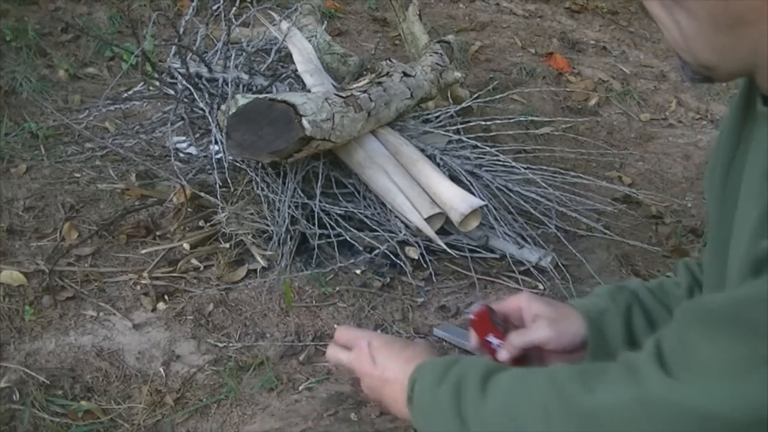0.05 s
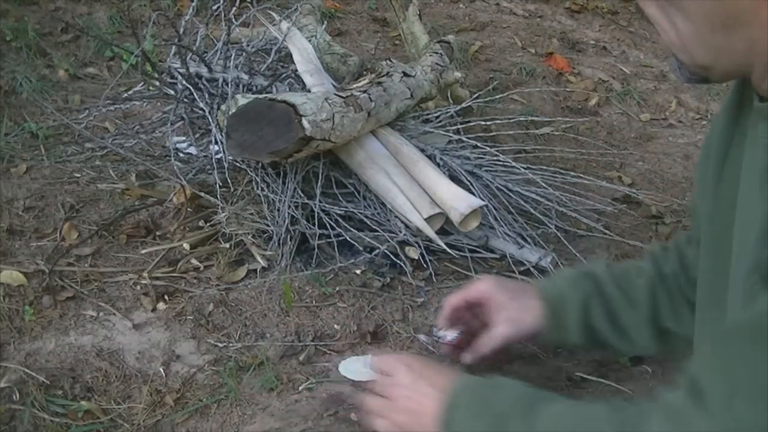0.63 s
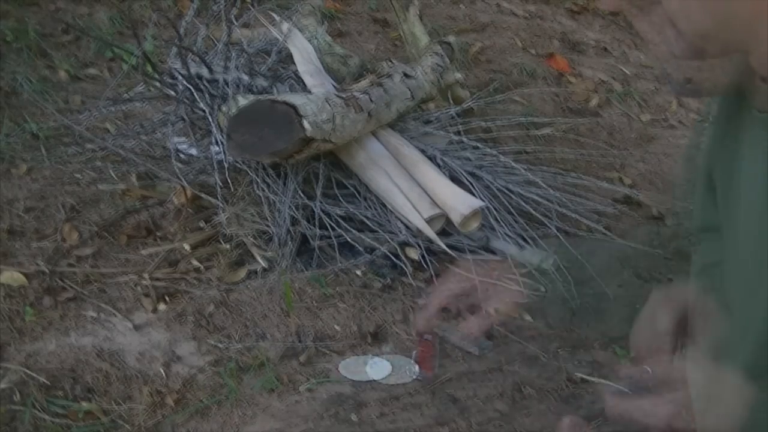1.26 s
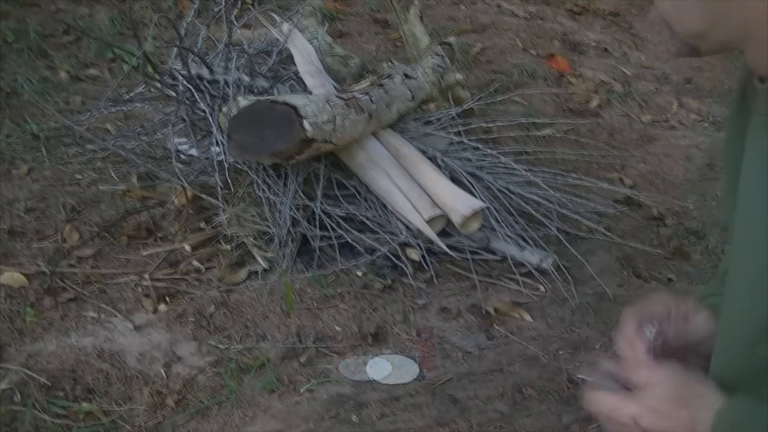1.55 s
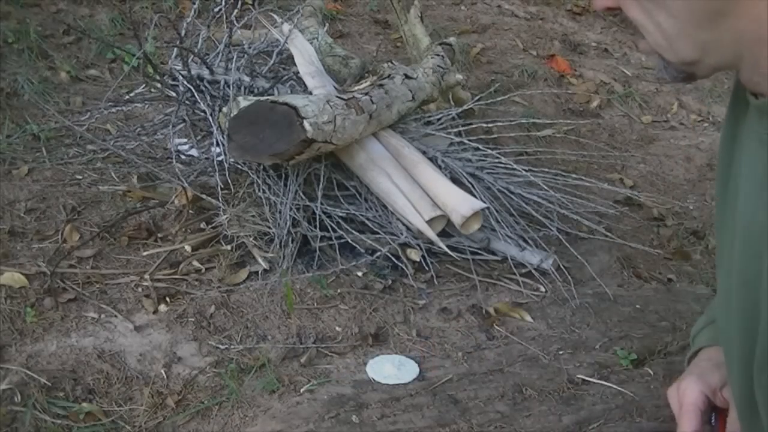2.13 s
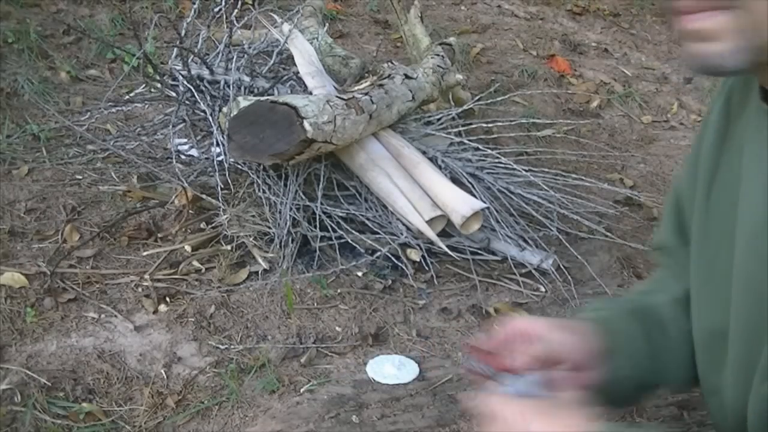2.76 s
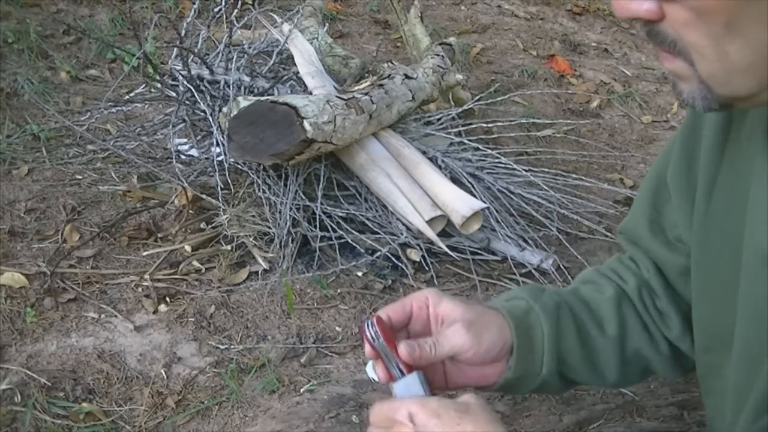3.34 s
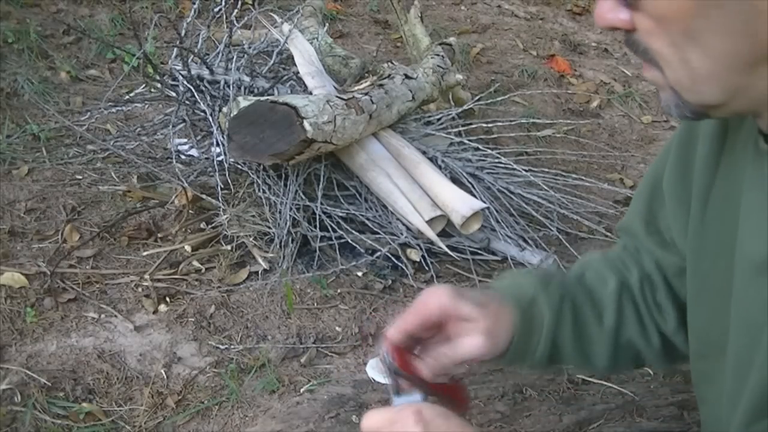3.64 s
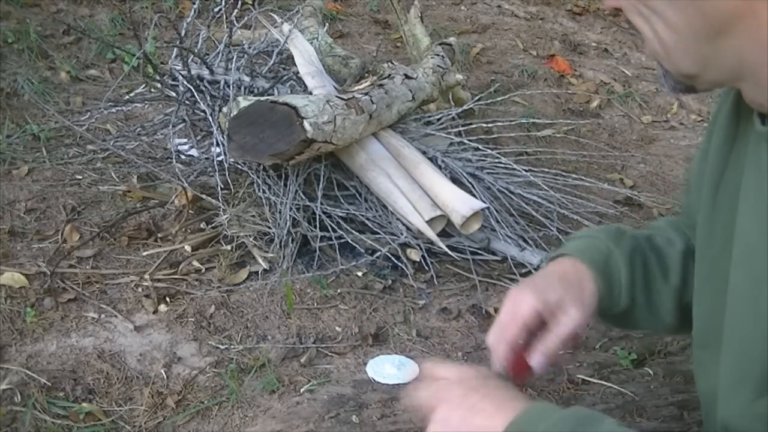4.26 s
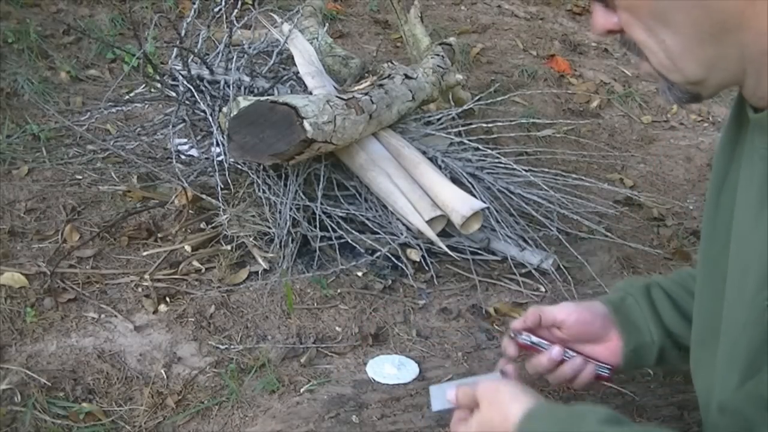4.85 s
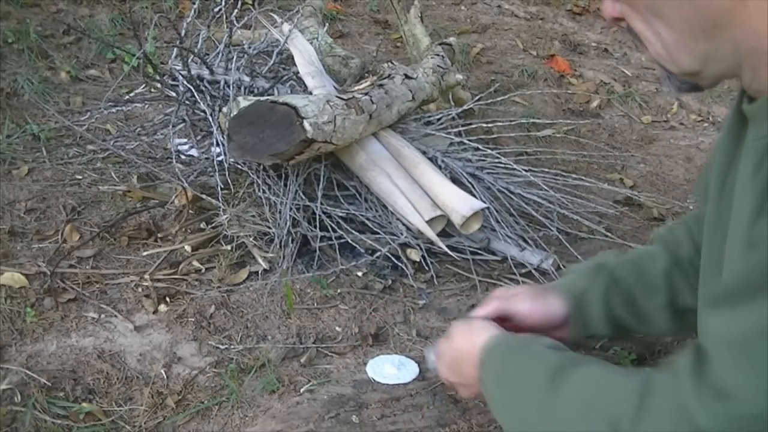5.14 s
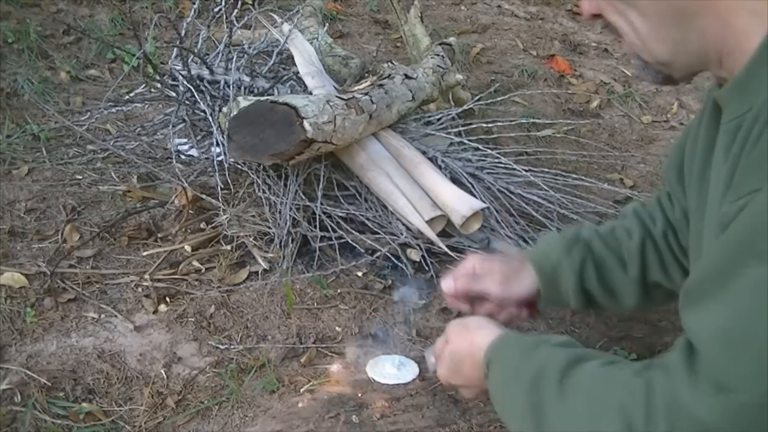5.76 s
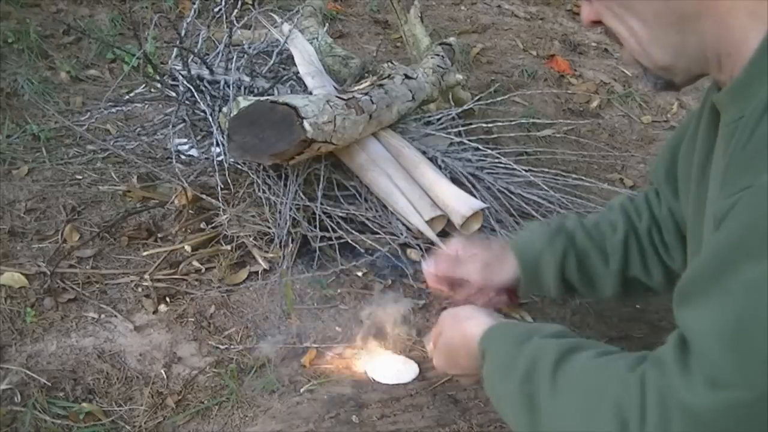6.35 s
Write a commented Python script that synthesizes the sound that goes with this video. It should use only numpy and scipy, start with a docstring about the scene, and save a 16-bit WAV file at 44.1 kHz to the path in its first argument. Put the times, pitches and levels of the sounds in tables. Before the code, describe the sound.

A quiet wood, with a soft hush and a faint, steady, high drone of crickets throughout. A far bird gives short, thin chirps, and a distant vehicle passes faintly, its engine rising, nearest around 3 seconds. Close in front, a pocket knife is handled with light metal taps from 0.3 seconds; sleeves rustle, the pivot squeaks slightly, and a tool clacks shut at 1.4 seconds. Soft cloth rubs and swishes follow. After a small click at 4 seconds, a blade snaps open sharply at 4.2, with a brief steel ring and a faint echo from the trees. At 5.4 the blade ticks against a fire-striker rod. At 5.65 comes a loud, short, shrieking scrape, then a spitting crackle of sparks that dies quickly. A second scrape at 6.3 seconds throws another sizzling shower, with small pops until about 6.6.

```python
"""A pocket knife, handled close to a stereo pair in a quiet wood: one tool clacks shut, another snaps
open, each blow ringing the steel. The blade then sticks and slips twice down a fire-striker rod: a
short shriek, and a spitting shower of burning shavings onto a fuel tablet. Sleeves rub by the
microphones. Crickets drone behind, a far bird calls, a distant vehicle passes with its engine
rising, and the trees send back a faint echo."""
import sys
import numpy as np
from scipy import signal
from scipy.fft import rfft, irfft
from scipy.io import wavfile
from scipy.ndimage import uniform_filter1d

SR = 44100
rng = np.random.default_rng(int(sys.argv[2]) if len(sys.argv) > 2 else 0)


def waveform_to_disk(signal):
    """Save audio, clipped to [-1, 1], as 16-bit WAV at the path in sys.argv[1]."""
    frames = np.transpose(np.atleast_2d(signal))
    scaled = np.clip(frames, -1, 1) * 32767
    samples = np.round(scaled).astype(np.int16)
    wavfile.write(sys.argv[1], SR, samples)


N = 291501
TIME = np.arange(N) / SR
CUTOFF_HZ = 16000


def from_db(db):
    return 10 ** (np.asarray(db) / 20)


def rms_one(x):
    return x / np.sqrt(np.mean(x ** 2) + 1e-20)


def as_burst(x):
    """Scale a short sound to the energy of 3 ms at rms 1."""
    return x / np.sqrt(np.sum(x ** 2) / (.003 * SR) + 1e-20)


def at_hz(points, hz):
    """Read a table on a log-frequency axis."""
    known_hz, values = np.transpose(points)
    return np.interp(np.log(hz + 1), np.log(known_hz), values)


def add(track, s, sound):
    """Mix a sound into a track at s seconds."""
    start = int(s * SR)
    track[start:start + len(sound)] += sound[:N - start]


def colour(x, spectrum, size=2048):
    """Causal (minimum-phase) filter with the given spectrum."""
    gain = from_db(at_hz(spectrum, np.fft.rfftfreq(size, 1 / SR)))
    cepstrum = irfft(np.log(gain))
    causal = np.r_[cepstrum[0], 2 * cepstrum[1:size // 2]]
    response = irfft(np.exp(rfft(causal, size)))
    return signal.fftconvolve(x, response)[:len(x)]


def resonate(x, hz, width_hz):
    """Two-pole resonance with gain 1 at its peak."""
    r = np.exp(-np.pi * width_hz / SR)
    feedback = [1, -2 * r * np.cos(2 * np.pi * hz / SR), r * r]
    return signal.lfilter(np.array([1, 0, -1]) * (1 - r * r) / 2, feedback, x + 1e-18)


def even(x, size):
    """Hold the rms over `size` samples at 1, keeping the fine grain."""
    return x / np.sqrt(np.abs(uniform_filter1d(x ** 2, size)) + 1e-12)


def grains(per_s, spread_db):
    """Random clicks, many small and a few large; rms 1."""
    sizes = from_db(spread_db * np.minimum(rng.exponential(1, N), 5)) * rng.choice([-1, 1], N)
    return rms_one(sizes * (rng.random(N) < per_s / SR))


def slow_noise(rate_hz):
    """Smooth random wandering; rms 1."""
    r = np.exp(-2 * np.pi * rate_hz / SR)
    return rms_one(signal.lfilter([1], [1, -2 * r, r * r], rng.standard_normal(N + SR))[SR:])


def blurred_tone(hz, blur_hz):
    """A tone spread into a narrow band; rms 1."""
    phase = 2 * np.pi * np.cumsum(hz) / SR
    return rms_one(slow_noise(blur_hz) * np.sin(phase) + slow_noise(blur_hz) * np.cos(phase))


def glides(rows, blur_hz):
    """Thin, wavering notes that glide as they swell and fade."""
    out = np.zeros(N)
    waver = (slow_noise(blur_hz) + 1j * slow_noise(blur_hz)) / np.sqrt(2)
    for s, length, start_hz, end_hz, level_db in rows:
        along = np.linspace(0, 1, int(length * SR))
        phase = 2 * np.pi * np.cumsum(start_hz + (end_hz - start_hz) * along) / SR
        note = rms_one(np.real(waver[int(s * SR):][:len(along)] * np.exp(1j * phase)))
        add(out, s, from_db(level_db) * np.sin(np.pi * along) * note / np.sqrt(2))
    return out


def envelope(s, hold_s, rise_db_per_s, slope_db_per_s, fall_db_per_s):
    """Gain that rises to 1 at s, slopes up or down while it holds, then falls."""
    t = TIME - s
    rise_db = rise_db_per_s * np.minimum(t, 0)
    slope_db = slope_db_per_s * np.clip(t, 0, hold_s)
    fall_db = fall_db_per_s * np.maximum(t - hold_s, 0)
    return from_db(np.maximum(rise_db + slope_db - fall_db, -200))


def diffuse_noise():
    """White noise from all around, as two closely spaced microphones pick it up."""
    # likeness of left and right: f/Hz, correlation
    likeness = [(60, 0.226), (180, 0.66), (350, 0.69), (700, 0.64), (1500, 0.6), (3500, 0.88), (8000, 0.95)]
    alike = np.clip(at_hz(likeness, np.fft.rfftfreq(N, 1 / SR)), 0, 1)
    mid, side = rfft(rng.standard_normal((2, N)))
    return irfft(np.sqrt(1 + alike) * mid + np.sqrt(1 - alike) * side * [[1], [-1]], N)


def hush(spectrum):
    """Diffuse noise of a given colour; rms 1."""
    return rms_one(np.array([colour(side, spectrum) for side in diffuse_noise()]))


def air(level_db=-60.5):
    """The steady hush of the wood, all around the microphones."""
    # spectrum of the air: f/Hz, level/dB
    spectrum = [(30, -49.5), (110, -39), (180, -20.5), (280, -10), (430, -2), (800, 1), (1500, 0.5),
                (2600, -2.5), (4200, -4), (6000, -10), (8500, -17.5), (12000, -25.5), (15500, -33)]
    return from_db(level_db) * hush(spectrum)


def crickets():
    """So many sing at once that each chorus blurs into a narrow steady band."""
    # choruses: f/Hz, width/Hz, level/dB
    choruses = [(2976, 45, -73.5), (3326, 370, -66.5), (3448, 199, -72), (3578, 85, -71),
                (4283, 200, -76.5)]
    return sum(from_db(db) * rms_one(resonate(resonate(diffuse_noise(), hz, width), hz, width))
               for hz, width, db in choruses)


def vehicle(level_db=-65, road_m=21.4, speed_m_per_s=19.4, nearest_s=2.9):
    """Tyre rush and a faint rising engine note swell and sink with the distance along a far road."""
    # spectrum of the tyres: f/Hz, level/dB
    tyres = [(80, -46.5), (150, -42), (300, -15.5), (450, -2), (950, 0.5), (1400, -4), (3000, -26),
             (8000, -51)]
    # engine harmonics: multiple of the pitch, level/dB against the tyres
    harmonics = [(2, -11.5), (3, -11.5), (4, -11)]
    low_hz, high_hz, steepest_s, climb_s = 194, 268.4, 2.45, 1.3
    revs = (1 + np.tanh((TIME - steepest_s) / climb_s)) / 2
    pitch_hz = low_hz + (high_hz - low_hz) * revs
    engine = sum(from_db(db) * blurred_tone(k * pitch_hz, blur_hz=7) for k, db in harmonics)
    distance_m = np.hypot(road_m, speed_m_per_s * (TIME - nearest_s))
    return from_db(level_db) * road_m / distance_m * (hush(tyres) + engine)


def bird():
    """Short, thin calls from far off in the wood."""
    # notes: t/s, length/s, start f/Hz, end f/Hz, level/dB
    notes = [(.29, 0.052, 4370, 4220, -66), (1.92, 0.08, 4360, 4180, -62.5), (2.32, 0.11, 4100, 4250, -66),
             (3.119, 0.1, 4230, 4400, -65), (3.41, 0.038, 4640, 4540, -61.5),
             (4.393, 0.054, 4320, 4270, -61), (4.568, 0.047, 4540, 4610, -66),
             (4.98, 0.047, 4290, 4300, -72.5), (5.87, .08, 4350, 4260, -70)]
    return glides(notes, blur_hz=28)


def trees(x, t60_s=0.37, delay_s=.004):
    """Trunks, twigs and ground scatter a short, thin echo of unit energy back to the microphones."""
    # spectrum of the echo: f/Hz, level/dB
    spectrum = [(200, -12.5), (1000, -3), (2500, 0.5), (4200, -0.5), (7400, -4.5), (9000, -20),
                (16000, -19)]
    t = TIME[:SR // 2]
    scatter = np.array([colour(side[:len(t)], spectrum) for side in diffuse_noise()])
    tail = scatter * from_db(-60 * t / t60_s) * (t > delay_s)
    return signal.fftconvolve(x[None], rms_one(tail) / np.sqrt(len(t)), axes=1)[:, :N]


def contacts(rows, body, chatter_db, leak_db, low_hz=350, top_spreads=1.45):
    """Each contact is a blow and a brief chatter; a harder one wakes a wider range of the body's modes."""
    medium_octaves, medium_blow_db, doubling_db = 1.05, -35, 19.5
    out, t = np.zeros(N), TIME[:SR // 20]
    hz, mode_db, t60 = np.transpose(body)
    modes = from_db(-60 * t / t60[:, None]) * np.sin(2 * np.pi * hz[:, None] * t)
    for s, level_db, centre_hz, chatter_t60_s in rows:
        spread_octaves = medium_octaves * 2 ** ((level_db - medium_blow_db) / doubling_db)
        force = from_db(chatter_db - 60 * t / chatter_t60_s) * rng.standard_normal(len(t))
        force[0] = 1  # the blow itself
        # soft contacts lack treble, and small parts radiate next to no bass
        top_hz = np.clip(centre_hz * 2 ** (top_spreads * spread_octaves), 2 * low_hz, CUTOFF_HZ)
        force = signal.sosfilt(signal.butter(2, [low_hz, top_hz], "band", fs=SR, output="sos"), force)
        woken = np.exp(-.5 * (np.log2(hz / centre_hz) / spread_octaves) ** 2)
        weight = from_db(mode_db) * (woken + from_db(leak_db))
        ring = (weight * (-1) ** np.arange(len(hz))) @ modes
        add(out, s, from_db(level_db) * as_burst(signal.fftconvolve(force, ring)[:len(t)]))
    return out


def knife():
    """Taps and clacks ring the steel and handle; the pivot squeaks as a tool folds shut."""
    # contacts: t/s, level/dB, centre f/Hz, chatter t60/s
    clicks = [(.350, -42.5, 866, .004), (.4918, -46.5, 1350, 0.012), (.503, -49, 1625, .016),
              (.788, -49, 2840, 0.0076), (1.160, -53, 2800, .008), (1.193, -51.5, 1880, 0.017),
              (1.228, -44.5, 3320, .048), (1.281, -50, 2400, .008), (1.291, -43.5, 1400, .015),
              (1.3322, -40.5, 2700, .02), (1.4391, -23.5, 3530, 0.0072), (1.4455, -33, 4000, 0.016),
              (2.92, -54.5, 4600, .015), (3.983, -36, 2730, 0.01), (4.019, -50, 1790, 0.004)]
    # modes of steel and handle: f/Hz, level/dB, t60/s
    body = [(520, -20, .008), (780, -14, .008), (1105, -13, 0.015), (1600, -6, 0.012), (2345, -7, 0.0067),
            (2810, -4, 0.011), (3274, -4, 0.0097), (3950, -1.5, 0.0079), (4240, -0.5, 0.0056),
            (4770, 0, 0.0061), (5864, -1.5, .007), (6710, -5.5, 0.0088), (7400, -9.5, 0.0073),
            (8800, -12, 0.01), (12100, -8, 0.004), (13600, -16, .005), (15400, 3, 0.0045)]
    # pivot squeaks: t/s, length/s, start f/Hz, end f/Hz, level/dB
    squeaks = [(1.335, 0.067, 7400, 7100, -57), (1.42, 0.024, 7300, 7200, -60)]
    return contacts(clicks, body, chatter_db=-12.5, leak_db=-32) + glides(squeaks, blur_hz=70)


def rubbing(slips_per_s=5000, spread_db=3):
    """Cloth and skin catch in countless tiny slips; the sleeve's weave zips on quick moves of the arm."""
    # one swell per movement of the hand: middle t/s, length/s, level/dB
    rubs = [(1.09, 0.54, -60.5), (1.375, 0.13, -53.5), (1.65, 0.8, -67), (2.93, .4, -63),
            (3.544, .7, -65.5), (4.696, 1, -68)]
    # spectrum of the cloth: f/Hz, level/dB
    cloth = [(200, -25.5), (800, 3.5), (2500, -0.5), (5200, -2.5), (7300, -7), (9000, -25), (16000, -35)]
    # zips of the weave: t/s, length/s, start f/Hz, end f/Hz, level/dB
    zips = [(.865, .14, 5900, 4750, -59), (1.62, .07, 5180, 5370, -65), (3.505, .125, 5900, 4380, -55.5),
            (3.715, .04, 5570, 6450, -64.5), (3.84, .09, 6700, 4450, -59)]
    movement = sum(from_db(db) * np.cos(np.pi * np.clip((TIME - s) / length, -.5, .5))
                   for s, length, db in rubs)
    friction = rms_one(colour(grains(slips_per_s, spread_db), cloth))
    return movement * friction + glides(zips, blur_hz=310)


def blade_snap():
    """The blade springs open and settles, ringing together with the back spring."""
    # contacts: t/s, level/dB, centre f/Hz, chatter t60/s
    blows = [(4.1822, -34.5, 4800, .005), (4.185, -15.5, 5000, 0.0038), (4.1885, -37, 6000, .012),
             (4.1975, -40, 4600, .012), (4.2105, -45, 5200, .04), (4.2368, -40.5, 4900, .018),
             (4.2435, -43, 4900, .007)]
    # modes of back spring and open blade: f/Hz, level/dB, t60/s
    spring = [(940, -14.5, 0.0074), (1230, -6.5, 0.0111), (1727, -1.5, 0.0053), (3133, -14.5, 0.017),
              (3755, 0.5, 0.0082), (4170, -2.5, 0.0069), (5137, 0, 0.0095), (5550, 7.5, 0.0029),
              (6230, -4, 0.0149), (7040, 4, 0.0076), (7830, -1, .006), (8980, -7, .006),
              (10500, -10.5, 0.0065), (11000, -14.5, 0.0085), (15140, -21, 0.0045)]
    return contacts(blows, spring, chatter_db=-15.0, leak_db=-24.5)


def scattered(x, low_hz=3200, high_hz=9500):
    """The open blade throws a different mix of treble in every direction, so its echo has no pitch."""
    pitchless = x * rng.choice([-1, 1], N)
    return signal.sosfilt(signal.butter(2, [low_hz, high_hz], "band", fs=SR, output="sos"), pitchless)


def rod_touch():
    """The blade is set against the striker rod, which rings briefly in the fingers."""
    # contact: t/s, level/dB, centre f/Hz, chatter t60/s
    touch = [(5.3673, -32, 3700, 0.0051)]
    # modes of the held rod: f/Hz, level/dB, t60/s
    rod = [(1620, -5, .008), (2240, 2.5, 0.0097), (3350, -4.5, .009), (3750, 0, 0.012), (4880, -2.5, 0.011),
           (6600, -12, 0.0099), (7080, -10, 0.01)]
    return contacts(touch, rod, chatter_db=-15.0, leak_db=-26)


def scrape(slips_per_s=1800, spread_db=2, grit_db=-4, low_cut_hz=1000):
    """The edge sticks and slips on the rod, harder as the push builds, and makes the blade shriek."""
    # resonances of the blade pressed on the rod: f/Hz, width/Hz, level/dB
    blade = [(1620, 400, -17), (2020, 260, -17), (2515, 180, -13), (3440, 220, -8), (3760, 154, -4),
             (3940, 130, -1), (4273, 80, 2), (4650, 114, 3.5), (4930, 130, 0), (5290, 170, -10.5),
             (7230, 460, -19), (8370, 320, -22), (11600, 2400, -38)]
    # catches along the rod: bite t/s, length/s, level/dB at letting go
    catches = [(5.414, 0.0043, -51), (5.6449, 0.0032, -28.5), (5.6522, .012, -12.5), (5.673, 0.01, -27),
               (6.115, 0.012, -47), (6.2991, 0.0043, -31.5), (6.308, 0.0085, -22), (6.32, .003, -19),
               (6.3233, 0.0056, -16)]
    friction = grains(slips_per_s, spread_db) + from_db(grit_db) * rng.standard_normal(N)
    shriek = sum((-1) ** k * from_db(db) * resonate(friction, hz, width)
                 for k, (hz, width, db) in enumerate(blade))
    shriek = signal.sosfilt(signal.butter(2, low_cut_hz, "high", fs=SR, output="sos"), shriek)
    # each catch bites at once, builds with the push, lets go, and skids on faintly
    bite, build, let_go, skid_fade = 14000, 900, 3200, 750  # dB/s
    push = np.zeros(N)
    for s, length, level_db in catches:
        catch = from_db(-build * length) * envelope(s, length, bite, build, let_go)
        skid = from_db(-10) * envelope(s + length, 0, bite, 0, skid_fade)
        push = np.maximum(push, from_db(level_db) * np.maximum(catch, skid))
    return push * even(shriek, size=140)


def burning(embers_db=-10):
    """Gain of all spark showers: each flares, sags as it blazes and dies; its embers glow on, weaker."""
    # showers of burning shavings: flash t/s, level/dB, blaze/s, afterglow/s
    showers = [(5.686, -27.5, 0.029, 0.048), (5.734, -34, 0.0045, .02), (5.773, -50, 0.015, .05),
               (6.347, -23.5, .005, .112), (6.380, -29, 0.0041, 0.024), (6.475, -42.5, .002, .07),
               (6.525, -48, 0.0074, .02), (6.556, -34.5, 0.0024, .06)]
    flare, sag, die = 1498, 118, 900  # dB/s
    power = np.zeros(N)
    for s, level_db, blaze_s, glow_s in showers:
        blaze = envelope(s, blaze_s, flare, -sag, die)
        glow = from_db(embers_db) * envelope(s, glow_s, flare, -sag, die)
        power += (from_db(level_db) * np.maximum(blaze, glow)) ** 2
    return np.sqrt(power)


def sparks(per_s=5000, spread_db=1.5, hiss_db=-7, pop_t60_s=0.0037):
    """Hot shavings burn in the air as a dense crackle; a few burst on their own."""
    # spectrum of the burning: f/Hz, level/dB
    sizzle = [(110, -55), (230, -26), (380, -5), (750, -4), (1150, 4), (1900, 1), (2500, -2.5), (3700, 3.5),
              (5000, 4), (6600, 2), (8200, -10), (9800, -18), (12000, -18), (15800, -27)]
    # single sparks bursting: t/s, level/dB
    pops = [(5.709, -32), (5.7892, -52), (5.816, -49.5), (5.825, -52), (5.853, -54), (6.364, -29),
            (6.4437, -36), (6.561, -41), (6.5778, -39), (6.5825, -40.5)]
    crackle = colour(grains(per_s, spread_db) + from_db(hiss_db) * rng.standard_normal(N), sizzle)
    out = burning() * even(crackle, size=500)
    t = TIME[:SR // 50]
    for s, level_db in pops:
        burst = rng.standard_normal(len(t)) * from_db(-60 * t / pop_t60_s)
        add(out, s, from_db(level_db) * as_burst(colour(burst, sizzle)))
    return out


def scene(near_pan_db=0.3, far_pan_db=.5, hiss_db=-83):
    """Hands close in front, the wood all around, both a touch right; each microphone adds its own hiss."""
    hands_echo_db, snap_echo_db, bird_echo_db = -26, -16, -6
    hands = knife() + rod_touch() + scrape() + sparks() + rubbing()
    song = bird()
    snap = blade_snap()
    near_echo = trees(from_db(hands_echo_db) * hands + from_db(snap_echo_db) * scattered(snap))
    near = hands + snap + near_echo
    far = air() + vehicle() + crickets() + song + from_db(bird_echo_db) * trees(song)
    near *= from_db([[-near_pan_db], [near_pan_db]])
    far *= from_db([[-far_pan_db], [far_pan_db]])
    hiss = from_db(hiss_db) * rms_one(signal.lfilter([1], [1, -.7], rng.standard_normal((2, N))))
    return near + far + hiss


def record(dry):
    """The treble above CUTOFF_HZ is cut steeply."""
    return signal.sosfilt(signal.ellip(10, .1, 70, CUTOFF_HZ, fs=SR, output="sos"), dry)


dry = scene()
out = record(dry)
waveform_to_disk(out)
```